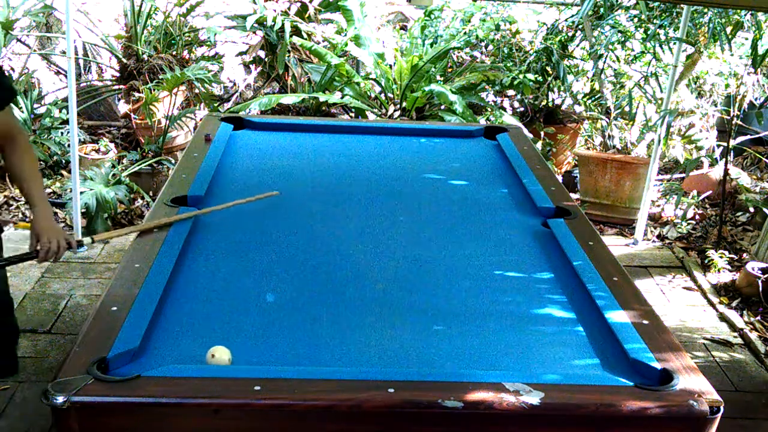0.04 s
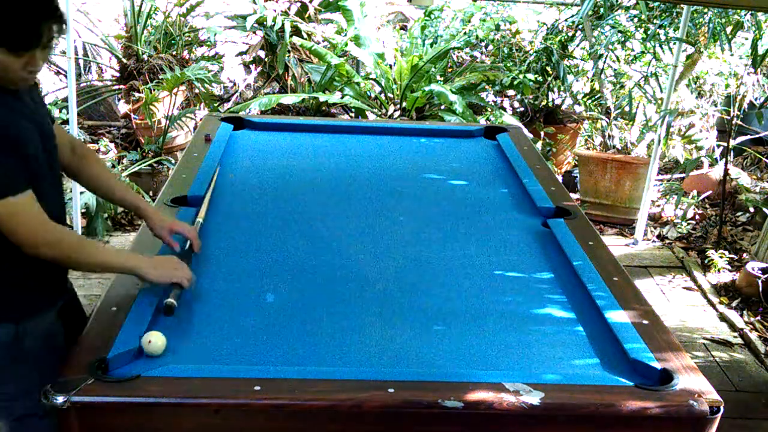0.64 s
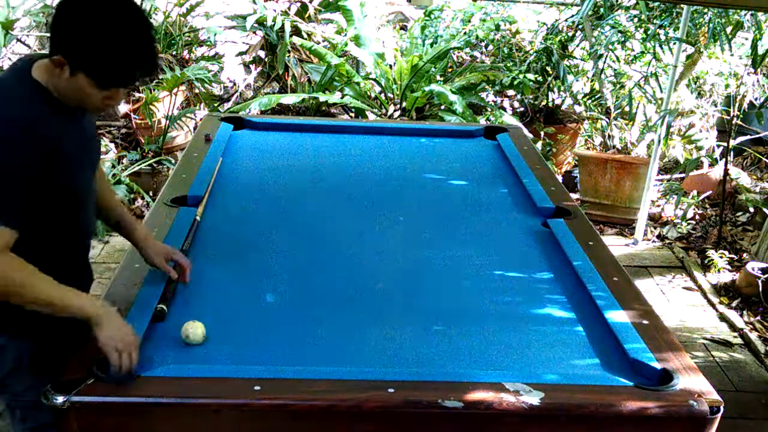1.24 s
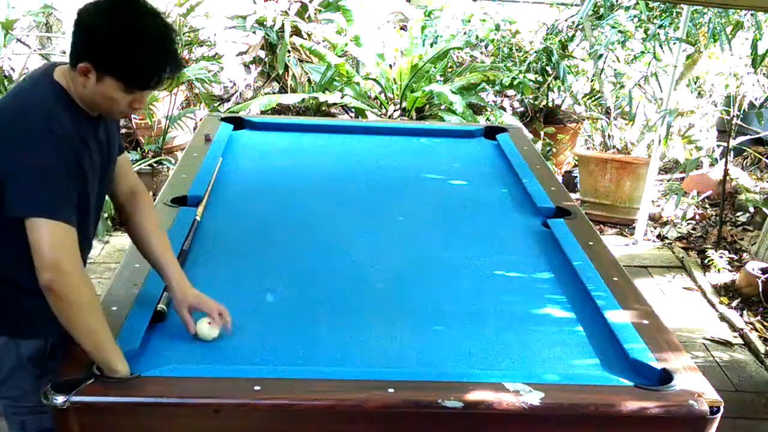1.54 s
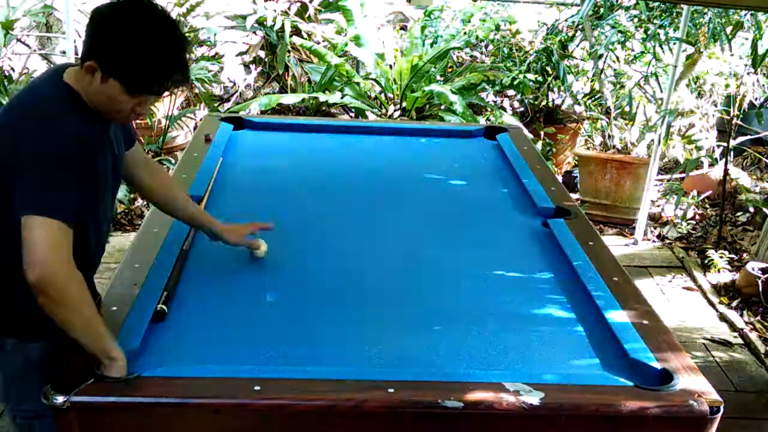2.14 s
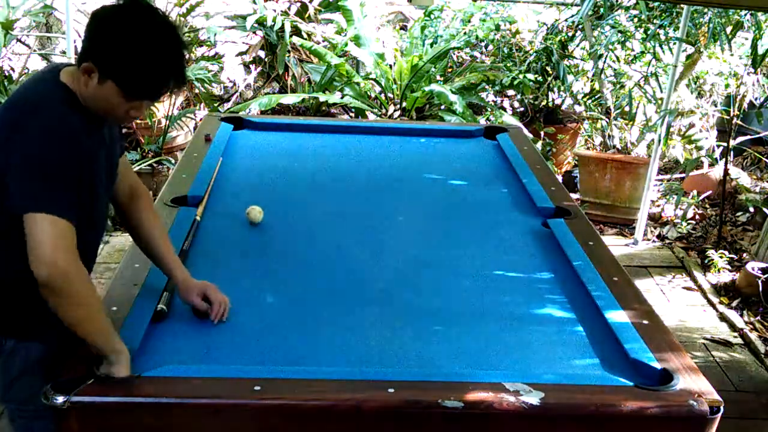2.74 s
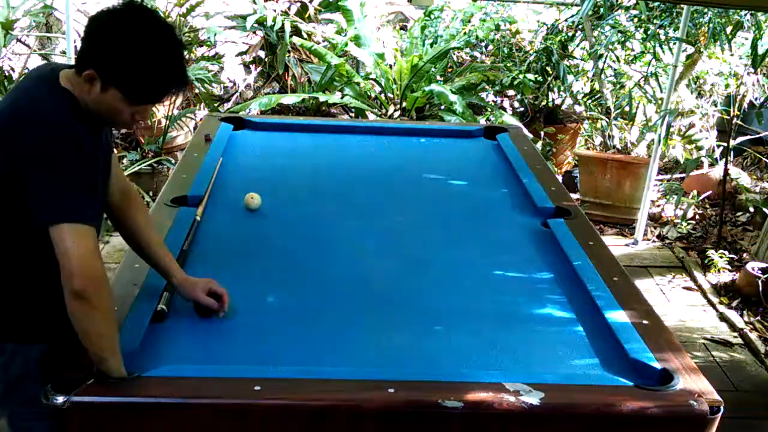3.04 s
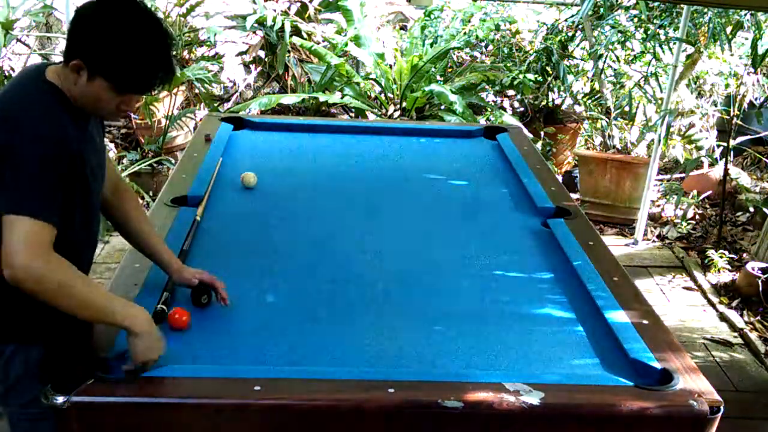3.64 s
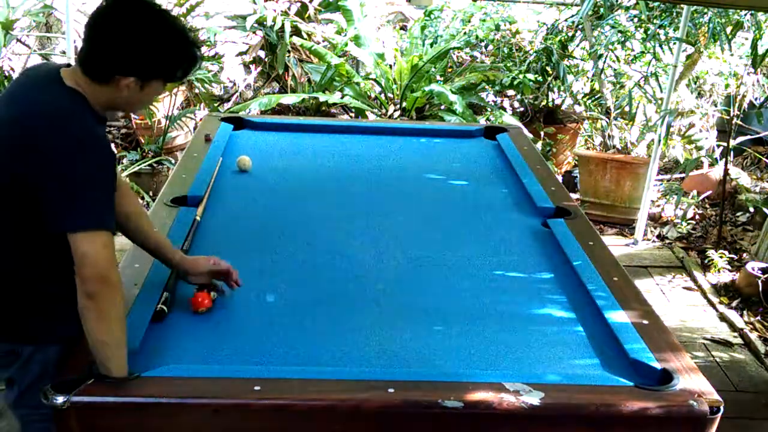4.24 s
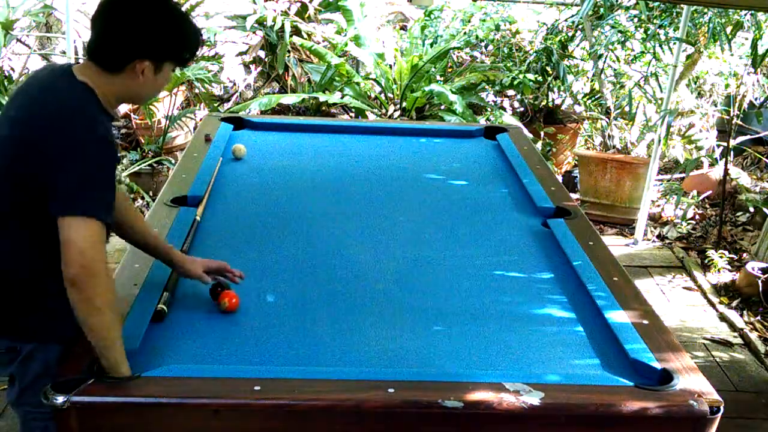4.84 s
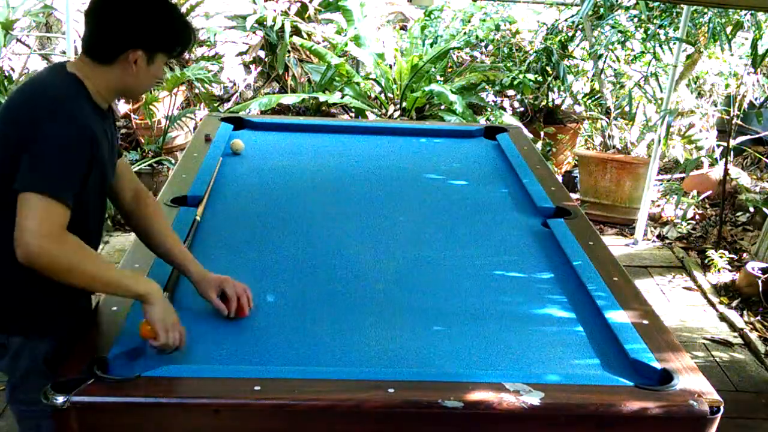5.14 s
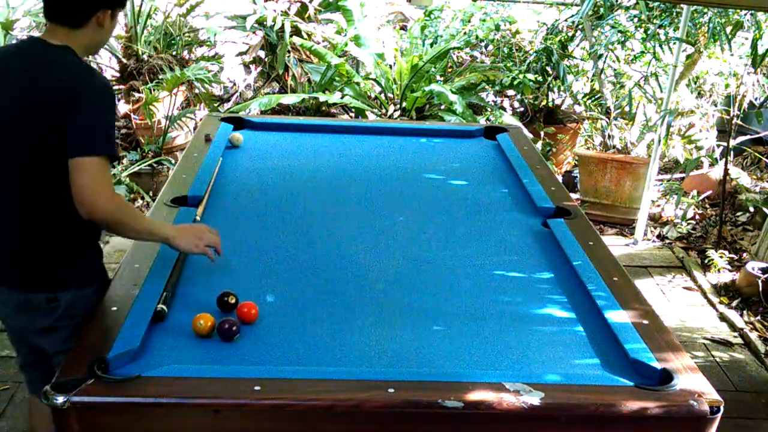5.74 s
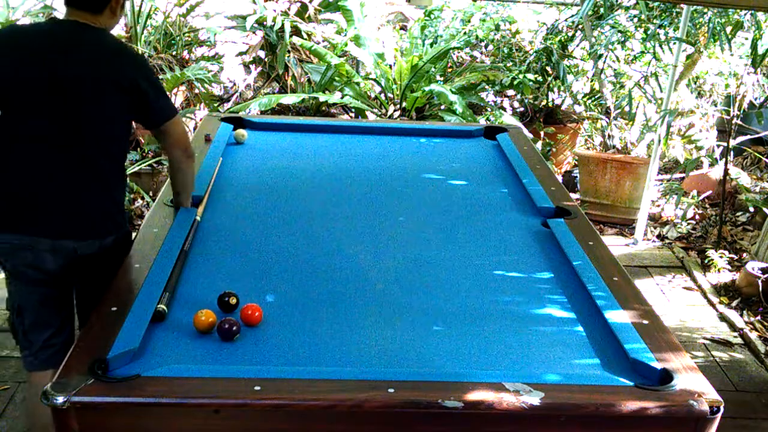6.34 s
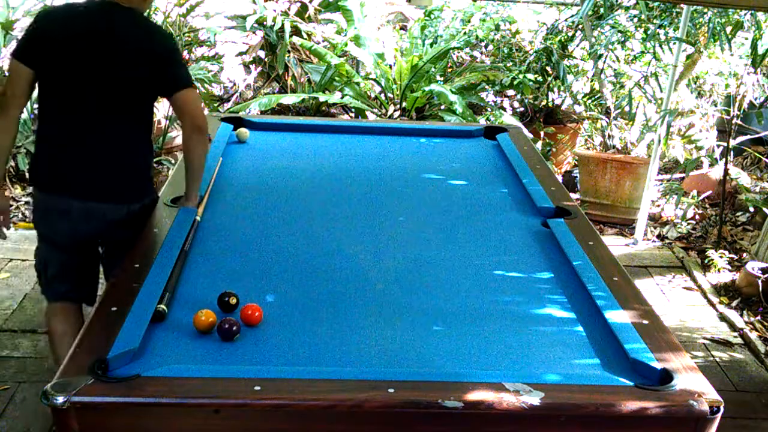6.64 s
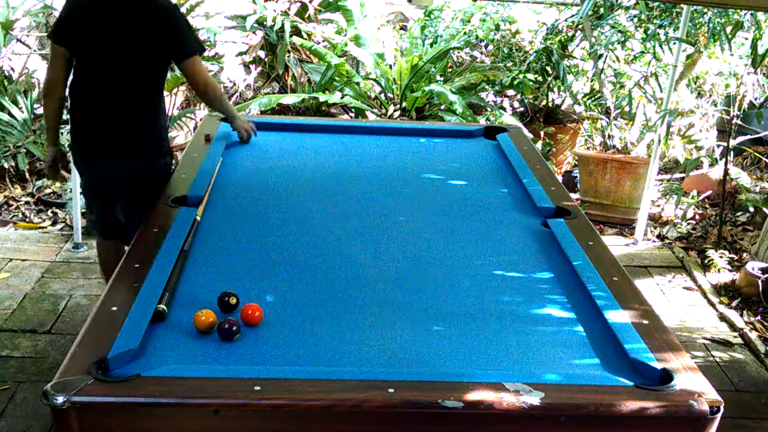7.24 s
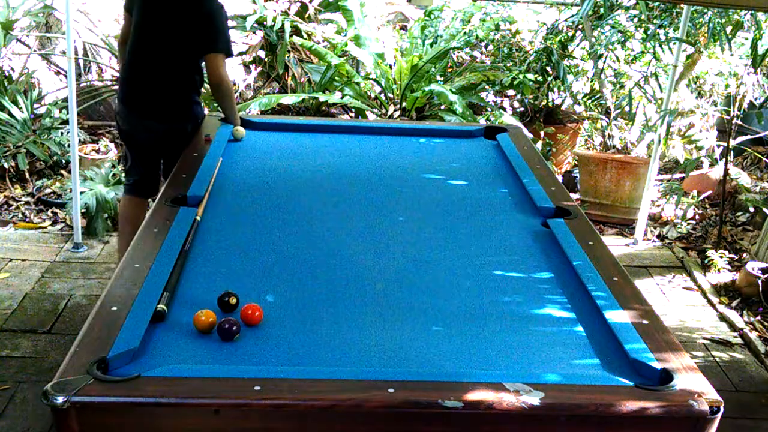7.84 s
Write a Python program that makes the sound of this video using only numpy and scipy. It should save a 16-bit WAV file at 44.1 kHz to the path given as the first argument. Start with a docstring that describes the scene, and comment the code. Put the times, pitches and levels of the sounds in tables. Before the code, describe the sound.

A cue and pool balls knock on a table and clack together, with sleeves rustling over steady outdoor hiss and rumble.

```python
"""Pool balls clack together and thud on a table as someone lays down a cue, lifts them from a pocket,
sets them on the cloth and walks off. Slate, frame and cue ring in damped modes under a patio roof;
sleeves brush past and soles scuff the paving, both as grainy noise. Behind lie garden hiss, traffic
rumble, faint birds and the firing tone of a distant engine.
A small camera widens the stereo and turns its gain down after each loud hit."""
import sys
import numpy as np
from scipy import signal
from scipy.fft import rfft, irfft
from scipy.io import wavfile
from scipy.ndimage import uniform_filter1d

SR = 44100
rng = np.random.default_rng(int(sys.argv[2]) if len(sys.argv) > 2 else 0)


def file_out(sig):
    """Save sig as 16-bit WAV at sys.argv[1]."""
    # one column per channel
    cols = np.atleast_2d(sig).T
    # limit, then scale
    lim = np.clip(cols, -1, 1)
    pcm = np.round(lim * 32767).astype(np.int16)
    wavfile.write(sys.argv[1], SR, pcm)


N = 352800
EVENT_N = 2 ** 15
T, HZ = np.arange(EVENT_N) / SR, np.fft.rfftfreq(EVENT_N, 1 / SR)  # axes of one event


def gain_of(db):
    """Decibels to amplitude."""
    return 10 ** (np.asarray(db) / 20)


def unit_rms(x):
    """Scales to rms 1."""
    return x / np.sqrt(np.mean(x ** 2) + 1e-20)


def curve(points, hz, column=1):
    """One table column, interpolated over log frequency."""
    columns = np.transpose(points)
    return np.interp(np.log(hz + 1), np.log(columns[0] + 1), columns[column])


def panned(pan_db):
    """Left and right gains for an L-R difference."""
    return gain_of(np.array([[pan_db / 2], [-pan_db / 2]]))


def add(mix, start_s, sound):
    """Mixes a sound in at start_s."""
    part = mix[:, round(start_s * SR):][:, :sound.shape[-1]]
    part += sound[..., :part.shape[1]]


def irregular_times(per_s):
    """One random time in each interval."""
    times = (np.arange(128) + rng.random(128)) / per_s
    return times[times < N / SR]


def minimum_phase(gain):
    """The most compact pulse with this spectrum."""
    log_gain = np.log(np.maximum(np.r_[gain, gain[-2:0:-1]], 1e-5))
    return np.fft.ifft(np.exp(np.conj(signal.hilbert(log_gain)))).real


def crested_tone(hz, crest_s):
    """A sine that swells until crest_s, then dies."""
    return T / crest_s * np.exp(1 - T / crest_s) * np.sin(2 * np.pi * hz * T)


def damped_mode(hz, t60_s, phase_turns):
    """A sine falling 60 dB in t60_s."""
    return np.exp(-np.log(1000) * T / t60_s) * np.sin(2 * np.pi * (hz * T + phase_turns))


def contact(x, corner_hz):
    """Low-pass: a softer contact lasts longer and excites less treble."""
    return signal.lfilter(*signal.butter(3, min(corner_hz, SR / 3), fs=SR), x)


def scatter(colour, t60_s, coherence, rise_s):
    """Dense stereo echoes, energy 1 per channel; t60_s is a number or a table over frequency."""
    left, other = irfft(np.exp(2j * np.pi * rng.random((2, len(HZ)))) * colour)
    right = coherence * left + np.sqrt(1 - coherence ** 2) * other
    hz, t, spectra = signal.stft([left, right], SR, nperseg=256)
    band_t60_s = t60_s if np.isscalar(t60_s) else curve(t60_s, hz)[:, None]
    tail = signal.istft(spectra * 10 ** (-3 * t / band_t60_s), SR, nperseg=256)[1][:, :EVENT_N]
    tail *= 1 - np.exp(-(T / rise_s) ** 2)
    return tail / np.sqrt(np.sum(tail ** 2) / 2)


# Outdoor noise spectrum: f/Hz, relative level/dB
AIR_SPECTRUM = [(15, -9), (20, -2), (60, -1), (92, -3.5), (160, 1), (230, -5.5), (330, -8), (600, -12),
                (900, -15), (1400, -19.5), (2000, -25.5), (2900, -27), (6500, -31), (11000, -31),
                (15300, -40.5)]
# Field at the two microphone ports: f/Hz, coherence, L-R/dB, left lead/rad
MIC_PORTS = [(50, 1, -4.5, 0.93), (118, 0.95, -1, 1.24), (242, 0.93, 11, -1.5), (458, 1, 3.5, -1.4),
             (805, 0.85, 5.5, -1.35), (1510, 0.024, -0.5, 0), (2850, 0.029, 5, 16), (5600, 0.028, 2, -45),
             (10500, 0.021, -5, -29)]
# Slow background drift: t/s, rumble gain/dB, overall gain/dB
AIR_DRIFT = [(0, 2.5, 0), (1.6, 0, 0.5), (3.3, -0.5, 0.37), (4.1, 2.5, -0.5), (4.45, 2, 1.5), (5.6, 0, 1),
             (6.3, -0.5, 0.5), (7.5, -1, 1.1), (8, 0.5, -0.5)]


def air(level_db=-36, patchy_db=3.0, flutter_db=2.24, swell_db=1.94, leaves_db=-0.54, rumble_hz=220):
    """Far traffic rumble and restless leaf hiss, coherent in the bass, unrelated in the treble."""
    frames, hz = N // 512 + 5, np.fft.rfftfreq(2048, 1 / SR)
    a, b, c, d, patches = rng.standard_normal((5, frames, len(hz))).transpose(0, 2, 1)
    coherence, pan_db, lead_rad = (curve(MIC_PORTS, hz, column=k)[:, None] for k in (1, 2, 3))
    left = a + 1j * b
    right = coherence * left * np.exp(-1j * lead_rad) + np.sqrt(1 - coherence ** 2) * (c + 1j * d)
    patches = unit_rms(uniform_filter1d(uniform_filter1d(patches, size=10, axis=1), size=10, axis=0))
    flutter = unit_rms(uniform_filter1d(rng.standard_normal(frames), size=4))
    swell = unit_rms(uniform_filter1d(rng.standard_normal(frames), size=40))
    stir_db = leaves_db + patchy_db * patches + swell_db * swell + flutter_db * flutter
    treble_share = (hz / (hz + 2500))[:, None]
    times, *drifts = np.transpose(AIR_DRIFT)
    rumble_db, overall_db = (np.interp(np.arange(frames) * 512 / SR, times, db) for db in drifts)
    drift_db = overall_db + rumble_db / (1 + (hz[:, None] / rumble_hz) ** 2)
    field_db = curve(AIR_SPECTRUM, hz)[:, None] + treble_share * stir_db + drift_db
    spectra = np.array([left * gain_of(pan_db / 2), right * gain_of(-pan_db / 2)]) * gain_of(field_db)
    return gain_of(level_db) * unit_rms(signal.istft(spectra, nperseg=2048, noverlap=1536)[1][:, :N])


# Engine drone envelope: t/s, level/dB
ENGINE_LEVELS = [(0.1, -39), (0.83, -37), (1.41, -45.5), (2.67, -42.5), (2.71, -35), (3.64, -38.5),
                 (3.83, -41.5), (7.76, -54), (7.8, -62)]


def engine(fast_hz=128.7, slow_hz=118.9, ease_at_s=1.75, ease_s=0.098, trim_db=-1, waver=0.22):
    """Only the firing tone of a far engine carries; it eases off once, wavering in level and phase."""
    t = np.arange(N) / SR
    eased = (1 + np.tanh((t - ease_at_s) / ease_s)) / 2
    firing = np.exp(2j * np.pi * np.cumsum(fast_hz + (slow_hz - fast_hz) * eased) / SR)
    a, b = unit_rms(uniform_filter1d(uniform_filter1d(rng.standard_normal((2, N)), size=1500), size=900))
    level = gain_of(trim_db + np.interp(t, *np.transpose(ENGINE_LEVELS)))
    tone = np.sqrt(2) * level * firing * (1 + waver * (a + 1j * b))
    return panned(pan_db=1) * np.real([tone * np.exp(1j), tone])  # left leads by 1 rad


# Near squeaks, chirps and, at 2.416 s, a high hiss as a ball slips from the fingers over the cloth:
# centre t/s, level/dB, f/Hz, width/Hz, length/s
NEAR_SQUEAKS_AND_SLIP = [(0.217, -50.5, 3680, 450, 0.027), (1.887, -46.5, 3940, 260, 0.016),
                         (2.416, -48, 12300, 2800, 0.038), (3.351, -49.5, 3810, 450, 0.021),
                         (3.778, -54, 3990, 350, 0.023), (4.56, -45.5, 6400, 1200, 0.016),
                         (5.147, -46, 5800, 300, 0.014), (7.366, -47.5, 6750, 1200, 0.018)]
# Far low calls: centre t/s, level/dB
FAR_CALLS = [(1.215, -52), (4.3, -57), (4.49, -57)]
CALL_HZ, CALL_WIDTH_HZ, CALL_S = 1930, 110, 0.073
CHIRP_DB, CHIRP_HZ, CHIRP_SPREAD_HZ, CHIRP_WIDTH_HZ, CHIRP_S = -61.5, 3710, 230, 380, 0.028


def chirps_and_slip(far_chirps_per_s=14):
    """Far birds, near squeaks and a ball slipping over the cloth, each a short swell of band noise."""
    out = np.zeros((2, N))
    low = [(s, db, CALL_HZ, CALL_WIDTH_HZ, CALL_S) for s, db in FAR_CALLS]
    times = irregular_times(far_chirps_per_s)
    pitches_hz = CHIRP_HZ + CHIRP_SPREAD_HZ * rng.uniform(-1, 1, size=128)
    far = [(s, CHIRP_DB, hz, CHIRP_WIDTH_HZ, CHIRP_S) for s, hz in zip(times, pitches_hz)]
    for s, db, hz, width_hz, length_s in NEAR_SQUEAKS_AND_SLIP + low + far:
        start_s = max(s - 2 * length_s, 0)
        envelope = np.exp(-np.minimum((2 * (T + start_s - s) / length_s) ** 2, 20))
        band = np.exp(-np.minimum(((HZ - hz) / width_hz) ** 2, 20))
        noise = unit_rms(irfft(rfft(rng.standard_normal(EVENT_N)) * band))
        add(out, start_s, gain_of(db) * envelope * noise)
    return out


# Hands, sleeves and cue sliding: peak t/s, level/dB, fade/s
BRUSH_STROKES = [(0.256, -38, 0.027), (0.33, -42.5, 0.038), (0.505, -40.5, 0.039), (0.527, -33, 0.012),
                 (0.69, -41, 0.041), (0.92, -28.5, 0.031), (1.70, -45, 0.075), (2.04, -49, 0.07),
                 (2.40, -53, 0.047), (2.69, -44, 0.05), (3.353, -43.5, 0.036), (4.008, -43, 0.019),
                 (4.455, -47, 0.12), (5.103, -42, 0.022), (5.147, -43.5, 0.056), (5.295, -44.5, 0.17),
                 (5.45, -42.5, 0.11), (5.75, -43, 0.037), (6.41, -48, 0.052), (6.744, -45.5, 0.04),
                 (7.06, -52, 0.54), (7.37, -47, 0.061), (7.936, -41.5, 0.037)]
# Cloth friction spectrum: f/Hz, relative level/dB
BRUSH_SPECTRUM = [(500, -15), (1500, -4), (2800, 1), (4500, -1), (6500, 2), (9000, -2), (12000, -3),
                  (15500, -7)]
RUSTLES_PER_S, RUSTLE_DB, RUSTLE_FADE_S = 3, -52, 0.11  # clothes stirring
SNAPS_PER_S, SNAP_DB, SNAP_S = 90, -4, 0.0035  # creases


def brushes(rise_share=0.34, grain_db=4.0, pan_db=-1, bright_db=1.0, bright_hz=6600, width_hz=1800):
    """Fibres catch and slip in tiny grains and creases snap; each port shades the sound differently."""
    t, hz = np.arange(N) / SR, np.fft.rfftfreq(N, 1 / SR)
    rustles = [(s, RUSTLE_DB, RUSTLE_FADE_S) for s in irregular_times(RUSTLES_PER_S)]
    coarse_t, power = t[::32], 0
    for s, db, fade_s in BRUSH_STROKES + rustles:
        stroke = np.exp(-np.maximum((s - coarse_t) / rise_share, coarse_t - s) / fade_s)
        power += (gain_of(db) * stroke) ** 2
    balance_db = curve(MIC_PORTS, hz, column=2) + pan_db
    colour_db = curve(BRUSH_SPECTRUM, hz) + bright_db * np.exp(-((hz - bright_hz) / width_hz) ** 2)
    colour = gain_of(colour_db + np.array([balance_db, -balance_db]) / 2)
    grains = rng.standard_normal((2, N))
    grains *= gain_of(grain_db * unit_rms(uniform_filter1d(rng.standard_normal(N), size=24)))
    impulses = rng.standard_normal((2, N)) * (rng.random(N) < SNAPS_PER_S / SR)
    snap = rng.standard_normal(EVENT_N) * np.exp(-T / SNAP_S)
    snaps = signal.oaconvolve(impulses, snap[None])[:, :N]
    friction = unit_rms(grains) + gain_of(SNAP_DB) * unit_rms(snaps)
    return np.interp(t, coarse_t, np.sqrt(power)) * unit_rms(irfft(rfft(friction) * colour, N))


# Patio reverberation: f/Hz, T60/s
PATIO_DECAY = [(200, 0.48), (600, 0.17), (1500, 0.14), (4000, 0.19), (12000, .15)]


def patio(colour):
    """Reverberation from roof, paving and plants."""
    return scatter(colour, PATIO_DECAY, coherence=0.19, rise_s=0.058)


# Cue and ball landings: t/s, place, level/dB, contact corner/Hz, ring/dB, return delay/s, return gain/dB
LANDINGS = [(0.482, "rail", -27, 2500, -1, .008, -12), (0.9317, "rail", -3.5, 2000, 3.5, .0085, -26),
            (0.9777, "rail", -14.5, 1200, -3, .007, -1.5), (1.0100, "rail", -21, 3300, 8, .0055, -13),
            (1.8889, "bed", -32, 2400, 4, 0.00304, 1), (2.581, "bed", -4, 2120, 1.5, .0082, -15),
            (2.6383, "bed", -12.5, 756, 7, 0.0067, -5), (3.351, "rail", -29, 2200, -2, .008, -7),
            (3.8858, "bed", -19.5, 790, 4.5, .008, -2.5), (5.104, "rail", -24.5, 1900, -1.5, 0.0033, -8),
            (5.3509, "corner", -9, 1000, 3.5, .0065, -8.5), (5.3978, "corner", -8.5, 1340, 1, 0.0071, -4.5)]
# Heavily damped first push of the bed: f/Hz, level/dB, crest/s
BED_PUSH = [(235, -25, 0.0041), (525, -8.5, 0.002), (952, -3, 0.00069), (1603, -10.5, 0.00072),
            (1910, -17, 0.0017)]
# Slate and frame modes by place struck: f/Hz, rail level/dB, bed level/dB, corner level/dB
SLATE_MODES = [(240, -21, -11, -9), (287.6, -15, -6, -7), (342.4, -4.5, -15, -5), (394.7, -7.5, -5, -7),
               (429, 2, -12, -18), (489.4, 3, -11, -23), (558.6, -4, 3, 8.5), (620, -2, 3, 6.5),
               (760, 1, -2, -3), (808, 6, 0.5, -10), (820, 4, -7, 3), (871, -3, 4, -7),
               (947, -15, -18, -10), (962, -2, 1, -9), (983, 8, 2, -11), (1090, 1, -8, 2),
               (1216, -3, 3, -27), (1255, 1.5, 1, -19), (1310, -8, -3.5, -20), (1300, -1, -1, -16),
               (1445, -5, 2, -18), (1800, -8, -10, -1), (1820, -26, -7, -20), (1830, -21, -4, -3),
               (1950, -24, -18, -8), (2000, -9, -18, -22)]
# Dense wash of the table's other modes: f/Hz, relative level/dB
WASH_SPECTRUM = [(60, -24), (200, -14.5), (330, -13.5), (480, -4), (700, -1), (950, -2), (1300, -4.5),
                 (1900, -12), (2500, -14), (3500, -17), (6000, -41), (12000, -65)]


def knocks(median_t60_s=0.21, modes_db=-4, wash_db=-4, wash_t60_s=0.084, room_db=-6, pan_db=7.5):
    """A landing pushes the bed, the push returns twice from the frame, then slate and wood ring on."""
    out, colour = np.zeros((2, N)), gain_of(curve(WASH_SPECTRUM, HZ))
    thump = -sum(gain_of(db) * crested_tone(hz, crest_s) for hz, db, crest_s in BED_PUSH)
    mode_hz, rail_db, bed_db, corner_db = np.transpose(SLATE_MODES)[:, :, None]
    place_db = {"rail": rail_db, "bed": bed_db, "corner": corner_db}
    t60_s = median_t60_s * (mode_hz / np.median(mode_hz)) ** -0.4  # higher modes die sooner
    for s, place, db, corner_hz, ring_db, return_s, return_db in LANDINGS:
        push = sum(gain_of(k * return_db) * np.interp(T - k * return_s, T, thump, left=0)
                   for k in range(3))
        modes = gain_of(place_db[place]) * damped_mode(mode_hz, t60_s, rng.random(mode_hz.shape))
        ring = modes.sum(0) * (1 - np.exp(-T / 0.004))
        ring *= gain_of(modes_db) / np.linalg.norm(ring)
        wash = gain_of(wash_db) * scatter(colour, wash_t60_s, coherence=0.15, rise_s=0.0073)
        room = gain_of(room_db) * patio(colour)
        tail = np.linalg.norm(thump) * gain_of(ring_db) * (ring + wash + room)
        add(out, s, gain_of(db) * panned(pan_db) * contact(push + tail, corner_hz))
    return out


# Ball on ball, and light cue taps: t/s, level/dB, pocket and rail rattle/dB
BALL_HITS = [(0.5255, -28, 5), (1.9003, -22, -7), (1.952, -32, 11), (3.8657, -0.8, -8.5),
             (3.9465, -19.5, 0), (3.9585, -26, 2), (5.075, -9.5, -7.5), (5.1037, -18, -3)]
# Ball impact spectrum: f/Hz, relative level/dB
BALL_SPECTRUM = [(150, -61), (500, -17), (900, -3.5), (1200, 1.5), (1750, 9), (2100, 2.5), (2650, -1),
                 (3400, -6), (4200, -22), (4800, -38), (6000, -33), (9000, -25)]
SOFT_CONTACT_HZ, FORCE_CONTACT_HZ = 1770, 6100  # corner at the lightest touch; added by a 0 dB blow
POCKET_HZ, POCKET_WIDTH_HZ, BALL_PAN_DB = 1830, 4800, 3


def clacks(trim_db=-2, rattle_t60_s=0.08, room_db=-17, echo_s=0.018, echo_db=-21, bed_db=-24):
    """Hard balls give a short pulse, brighter with force; pocket rattles, bed answers, roof echoes."""
    out, colour = np.zeros((2, N)), gain_of(curve(BALL_SPECTRUM, HZ))
    pulse = minimum_phase(colour)
    pulse /= abs(pulse).max()
    pocket = colour / np.hypot(1, 2 * (HZ - POCKET_HZ) / POCKET_WIDTH_HZ)
    for s, db, rattle_db in BALL_HITS:
        corner_hz = SOFT_CONTACT_HZ + FORCE_CONTACT_HZ * gain_of(db)
        rattle = gain_of(rattle_db) * scatter(pocket, rattle_t60_s, coherence=0.42, rise_s=0.00049)
        bed = gain_of(bed_db) * patio(gain_of(curve(WASH_SPECTRUM, HZ)))
        tail = np.linalg.norm(pulse) * (rattle + bed + gain_of(room_db) * patio(colour))
        clack = gain_of(db + trim_db) * panned(BALL_PAN_DB) * contact(pulse + tail, corner_hz)
        add(out, s, clack)
        add(out, s + echo_s, gain_of(echo_db) * clack)
    return out


# Cue on rail, ball on pocket rim, fingers, soles on paving: t/s, level/dB, centre f/Hz, fade/s
DRAGS = [(0.9205, -28, 2270, 0.027), (1.012, -41, 3280, 0.02), (4.552, -42, 7000, .012),
         (5.096, -28, 1500, 0.01), (5.0965, -37, 6000, .006), (5.138, -41, 7500, .012),
         (5.728, -43, 8900, 0.019), (6.129, -40.5, 1720, 0.017), (7.934, -39.5, 1730, 0.018)]


def scuffs(width_octaves=1.2, rise_s=0.001, pan_db=3):
    """A brief drag over a rough surface gives a short rasp."""
    out = np.zeros((2, N))
    for s, db, centre_hz, fade_s in DRAGS:
        band = np.exp(-(np.log2((HZ + 1) / centre_hz) / width_octaves) ** 2)
        envelope = (1 - np.exp(-T / rise_s)) * np.exp(-T / fade_s)
        grit = unit_rms(irfft(rfft(rng.standard_normal((2, EVENT_N))) * band))
        add(out, s, gain_of(db) * panned(pan_db) * envelope * grit)
    return out


# Cue chattering to rest: t/s, level/dB
SHAFT_BOUNCES = [(0.93, -40), (1.0100, -32), (1.0206, -34), (1.036, -41)]
# Shaft modes: f/Hz, level/dB, T60/s
SHAFT_MODES = [(1257, -4, 0.2), (1470, -1.5, 0.2), (1540, -14, .15), (1790, -17, .13), (1812, -9, 0.27),
               (2050, -6, 0.12)]


def cue(rise_s=0.001, pan_db=3):
    """The wooden shaft rings in a few clear modes after each contact with the rail."""
    out = np.zeros((2, N))
    for s, level_db in SHAFT_BOUNCES:
        ring = sum(gain_of(db) * damped_mode(hz, t60_s, rng.random()) for hz, db, t60_s in SHAFT_MODES)
        add(out, s, gain_of(level_db) * panned(pan_db) * (1 - np.exp(-T / rise_s)) * ring)
    return out


# Balls touching inside a pocket: t/s, level/dB, f/Hz
POCKET_CLINKS = [(1.891, -25.5, 1580), (1.892, -25, 1710), (4.7198, -24, 1750), (4.733, -29, 1820),
                 (4.743, -27, 1760), (5.466, -43, 1640), (5.481, -42, 1840)]


def clinks(crest_s=0.0006, room_db=-10, rattle_db=-3, rattle_t60_s=0.13):
    """Balls touch down inside a pocket; muffled, they ring for a few cycles with a dry rattle."""
    out, colour = np.zeros((2, N)), gain_of(curve(BALL_SPECTRUM, HZ))
    for s, db, hz in POCKET_CLINKS:
        ring = crested_tone(hz, crest_s)
        rattle = gain_of(rattle_db) * scatter(colour, rattle_t60_s, coherence=0.65, rise_s=0.00073)
        tail = contact(rattle + gain_of(room_db) * patio(colour), SOFT_CONTACT_HZ)
        add(out, s, gain_of(db) * panned(BALL_PAN_DB) * (ring + np.linalg.norm(ring) * tail))
    return out


def scene():
    """Table sounds over the garden background."""
    impacts = knocks() + cue() + clacks() + clinks()
    return impacts + brushes() + scuffs() + air() + engine() + chirps_and_slip()


# Stereo widener crossfeed: f/Hz, share subtracted
WIDENER_FEED = [(600, 0.088), (1300, 0.63), (2700, 0.52), (5300, 0.25), (8000, 0.26), (13000, 0.12)]


def widen(x, delay_s=0.000366):
    """Each channel loses a delayed, filtered copy of the other."""
    hz = np.fft.rfftfreq(N, 1 / SR)
    feed = curve(WIDENER_FEED, hz) * np.exp(-2j * np.pi * hz * delay_s)
    return x - irfft(rfft(x[::-1]) * feed, N)


def excess_db(x, threshold_db, recovery_db_per_s):
    """Peak level over a threshold, released at a steady rate."""
    over_db = np.maximum(20 * np.log10(abs(x).max(0) + 1e-9) - threshold_db, 0)
    fall_db = np.arange(N) * recovery_db_per_s / SR
    return np.maximum.accumulate(over_db + fall_db) - fall_db


def record(dry, duck_share=0.45, duck_attack_s=0.044, cutoff_hz=15600):
    """Camera chain: widener, gain control ducking after loud hits, peak limiter, low-pass."""
    wide = widen(dry)
    pole = np.exp(-1 / (duck_attack_s * SR))
    over_db = excess_db(wide, threshold_db=-9, recovery_db_per_s=17)
    duck_db = duck_share * signal.lfilter([1 - pole], [1, -pole], over_db)
    limit_db = uniform_filter1d(excess_db(wide, threshold_db=-1, recovery_db_per_s=16), size=16)
    low_pass = signal.firwin(511, cutoff_hz, window=("kaiser", 9), fs=SR)
    return signal.oaconvolve(wide / gain_of(duck_db + limit_db), low_pass[None], "same")


dry = scene()
out = record(dry)
file_out(out)
```